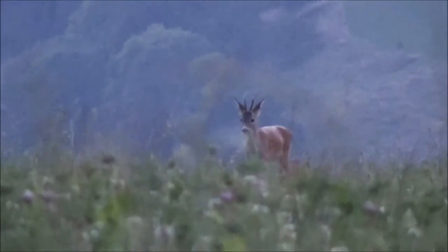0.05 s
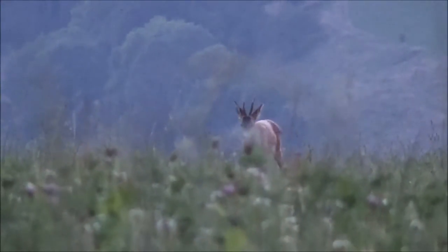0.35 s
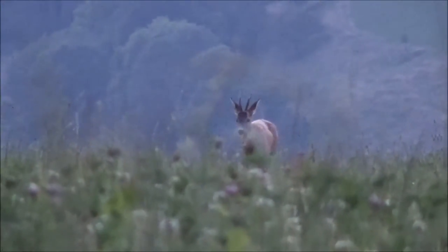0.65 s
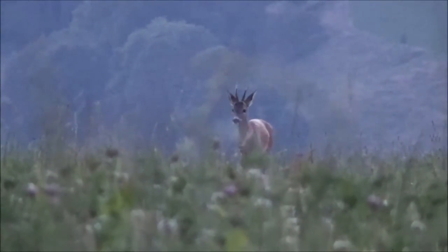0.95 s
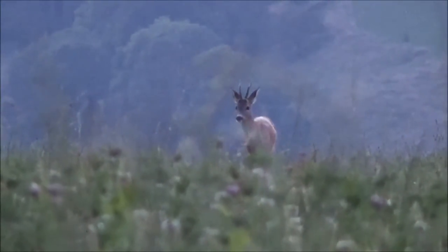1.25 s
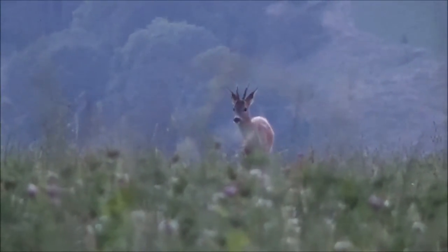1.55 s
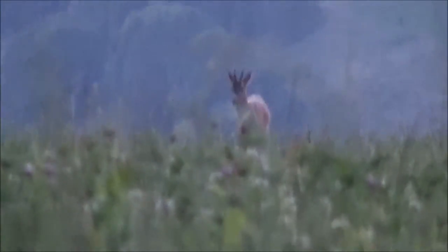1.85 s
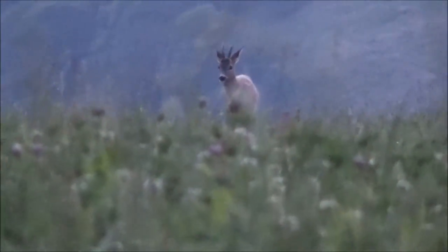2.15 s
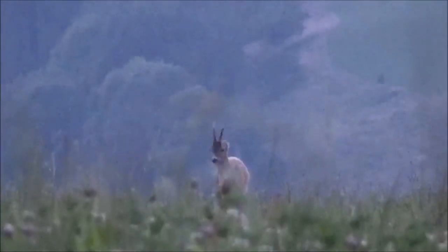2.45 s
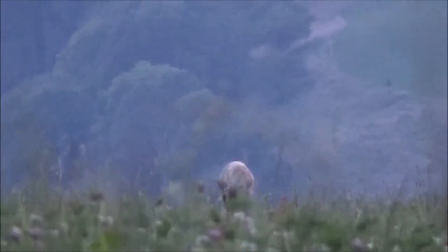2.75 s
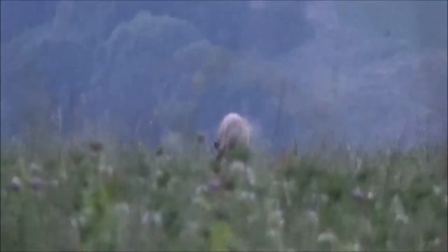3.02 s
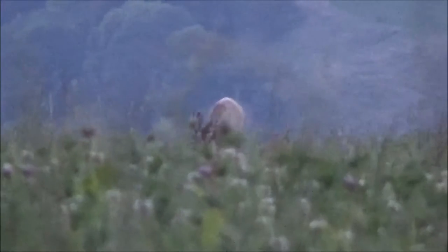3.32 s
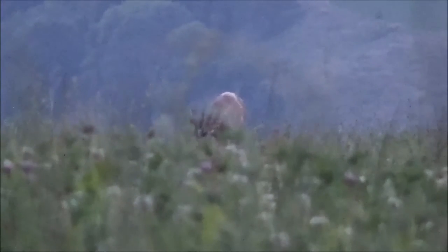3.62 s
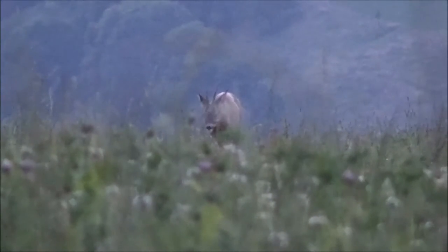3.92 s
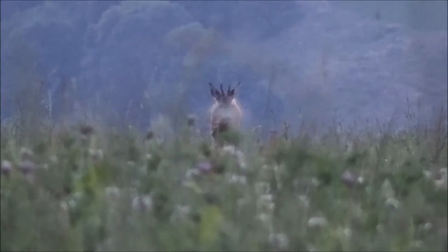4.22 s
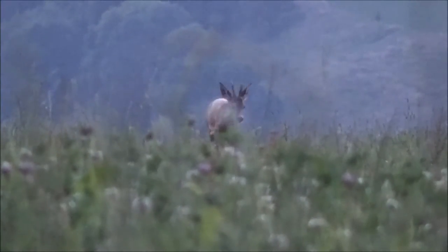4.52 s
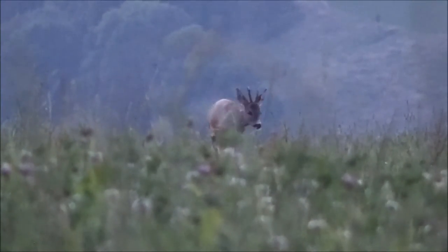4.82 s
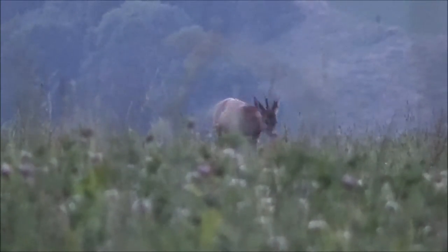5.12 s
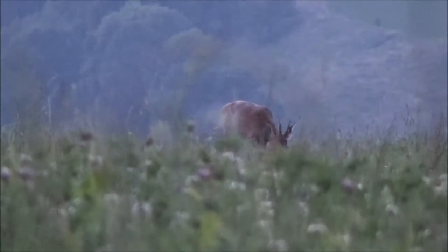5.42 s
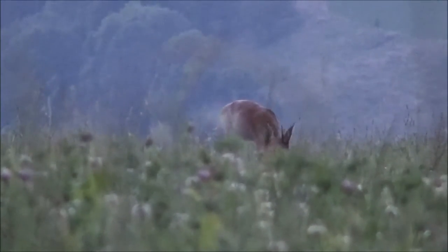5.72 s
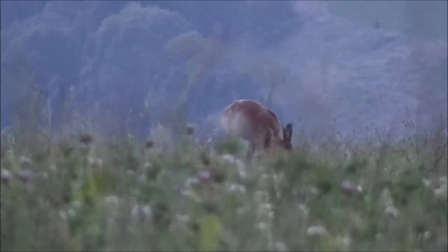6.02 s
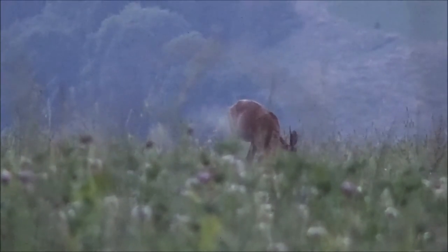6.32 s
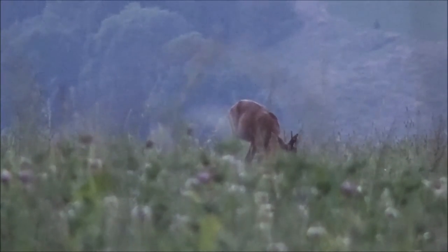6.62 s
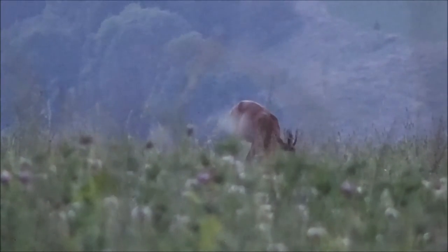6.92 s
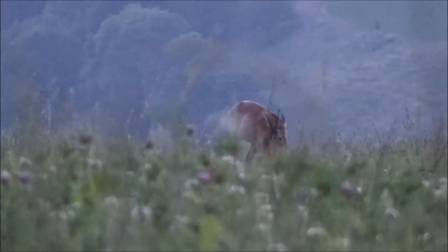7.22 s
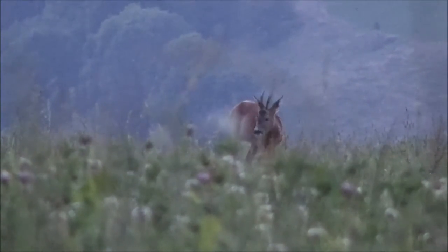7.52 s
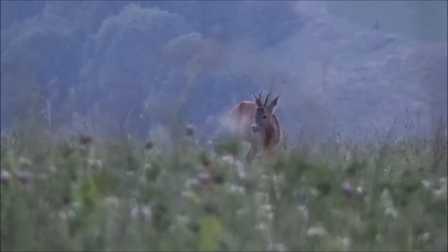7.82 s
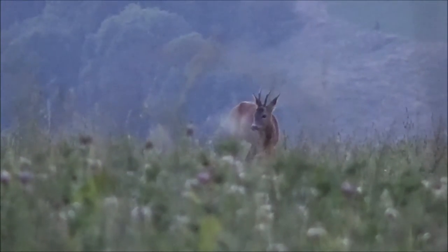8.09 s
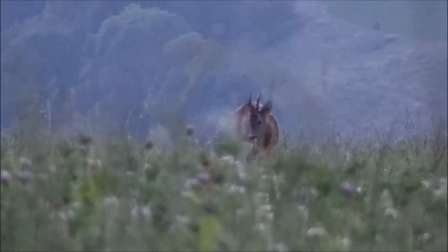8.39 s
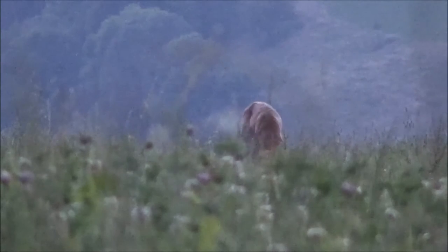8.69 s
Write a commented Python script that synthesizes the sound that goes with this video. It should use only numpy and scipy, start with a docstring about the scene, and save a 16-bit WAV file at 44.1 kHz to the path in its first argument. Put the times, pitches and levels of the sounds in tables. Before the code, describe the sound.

In an outdoor meadow, a wide bed of crickets keeps up a steady, high trill, with one nearer insect pulsing rapidly near the centre. Soft rustles and a small cluster of handling knocks on the microphone come early on. Two faint, echoing bird notes follow from far away, then mild low gusts of wind. A soft hush of air and a faint distant hum stay under the crickets throughout.

```python
"""Bush-crickets in an evening meadow.

One cricket trills close by without a break, and a chorus trills all around it.
Every wing stroke drags a row of file teeth over the scraper, and each tooth rings the wing.
Under them lie light wind, soft rustles and a far hum; a distant bird pipes twice,
and a few knocks ring the camera body."""
import sys
import numpy as np
from scipy import signal
from scipy.fft import rfft, irfft, next_fast_len
from scipy.io import wavfile

SR = 44100
rng = np.random.default_rng(int(sys.argv[2]) if len(sys.argv) > 2 else 0)


def put_to_file(sound):
    """Save the sound as 16-bit audio at rate SR, in the file named by the first command-line argument."""
    columns = np.atleast_2d(sound).T  # one column per channel
    safe = np.clip(columns, -1, 1)
    whole_steps = np.round(safe * 32767)
    wavfile.write(sys.argv[1], SR, whole_steps.astype(np.int16))


N = 394694


def undb(db):
    """Decibels to gain."""
    return 10 ** (np.asarray(db) / 20)


def unit(x):
    """Scale to rms 1."""
    return x / np.sqrt(np.mean(x ** 2))


def curve(rows):
    """An automation lane: (time, value) points joined by straight lines."""
    return np.interp(np.arange(N) / SR, *np.transpose(rows))


def colour(x, points):
    """EQ x with a (frequency, gain) curve drawn on a log frequency axis."""
    size = next_fast_len(N)
    hz = np.fft.rfftfreq(size, 1 / SR)
    point_hz, point_db = np.transpose(points)
    gain = undb(np.interp(np.log(hz + 1), np.log(np.sort(point_hz)), point_db))
    return irfft(rfft(x, size) * gain, size)[..., :N]


def fade(t, t60):
    """Exponential decay by 60 dB in t60 seconds."""
    return np.exp(-np.log(1000) * t / t60)


def swell(start, length):
    """One smooth rise and fall."""
    return np.sin(np.pi * np.clip((np.arange(N) / SR - start) / length, 0, 1))


def wander(count):
    """A random drift through count points."""
    return np.interp(np.arange(N), np.linspace(0, N, count), rng.standard_normal(count))


def pan(db):
    """Stereo gains that put left db above right."""
    return undb(np.array([[db], [-db]]) / 2)


def widen(mid, side):
    """Left and right from mid and side."""
    return np.array([mid + side, mid - side])


def scatter(x, t60, wet_db):
    """The direct sound and a diffuse tail that builds up from the surroundings."""
    t = np.arange(int(min(t60, 1) * SR)) / SR
    tail = rng.standard_normal(len(t)) * fade(t, t60) * (1 - fade(t, t60)) ** 2
    return x + undb(wet_db) * signal.oaconvolve(x, tail / np.linalg.norm(tail))[:N]


# Tone of the air bed, mid and side: (frequency [Hz], relative level [dB])
AIR_MID_EQ = [(12, -30), (22, 0), (60, -2), (90, -5), (140, -6.5), (200, -9.5), (280, -11), (780, -12.5),
              (1170, -13.5), (1740, -16), (3000, -19), (5200, -21), (7000, -41)]
AIR_SIDE_EQ = [(12, -32), (20, -9), (43, -16), (132, -9), (290, -4), (326, -4), (611, -2.5), (772, -4),
               (1070, -4.5), (3340, -11), (5200, -18), (6760, -50), (11400, -120)]
def still_air():
    """A wide, soft hush of shaped noise."""
    mid = unit(colour(rng.standard_normal(N), AIR_MID_EQ))
    side = unit(colour(rng.standard_normal(N), AIR_SIDE_EQ))
    return widen(undb(-38.7) * mid, undb(-40.5) * side)


# Low end of the wind: (frequency [Hz], relative level [dB])
WIND_EQ = [(12, -7), (25, -6.5), (50, 1), (75, -6.5), (110, -10), (200, -32), (500, -70)]
# Gust cues: (start [s], length [s], level [dB])
WIND_GUSTS = [(2.85, 1.25, -40), (3.42, 0.22, -38), (5.3, 0.15, -38), (5.9, 0.47, -34.5),
              (6.6, 0.21, -31.5), (6.75, 0.58, -36.5), (7.3, 2.1, -38.5)]
def wind(breeze_db=-46.5, eddy_db=1.5):
    """A light, rumbling breeze with gusts on top; eddies make it all flutter."""
    mid, side = unit(colour(rng.standard_normal((2, N)), WIND_EQ))
    gust_power = sum((undb(db) * swell(start, length)) ** 2 for start, length, db in WIND_GUSTS)
    strength = np.sqrt(undb(breeze_db) ** 2 + gust_power)
    flutter = undb(eddy_db * wander(count=80))
    return widen(mid, undb(-11.5) * side) * strength * flutter * pan(1.5)


# Tones of the hum: (pitch [Hz], waver [Hz], level [dB])
HUM_TONES = [(70.5, 1.95, -50.5), (110.2, 3.4, -52.5), (121.5, 3.12, -51), (169, 2.49, -53.5),
             (840, 3.1, -57)]
def far_hum():
    """A distant drone of sines, each wavering in pitch."""
    out = np.zeros(N)
    for hz, waver_hz, db in HUM_TONES:
        pitch = hz + waver_hz * wander(count=120)
        out += undb(db) * unit(np.sin(2 * np.pi * np.cumsum(pitch) / SR))
    return out


# Rustle cues: (start [s], length [s], centre [Hz], level [dB])
RUSTLE_CUES = [(0.014, 0.091, 500, -52), (1.76, 0.2, 1150, -43), (2.14, 0.21, 1050, -40.5),
               (3.244, 0.54, 940, -41.5), (3.25, 0.26, 115, -44)]
def rustles():
    """Soft, wide swells of noise, band-passed twice for steeper skirts."""
    out = np.zeros((2, N))
    for start, length, hz, db in RUSTLE_CUES:
        band = signal.iirpeak(hz, Q=1, fs=SR)
        noise = signal.lfilter(*band, rng.standard_normal((2, N)))
        out += undb(db) * swell(start, length) * unit(signal.lfilter(*band, noise))
    return out


# Bird notes: (start [s], length [s], pitch [Hz], dry level [dB])
BIRD_NOTES = [(4.71, 0.08, 1696, -39.5), (5.07, 0.17, 1720, -46.5)]
def bird():
    """Two thin notes of steady pitch that echo from the edge of the wood."""
    t = np.arange(N) / SR
    notes = sum(undb(db) * swell(start, length) * np.sin(2 * np.pi * hz * t)
                for start, length, hz, db in BIRD_NOTES)
    return np.array([scatter(notes, t60=2.2, wet_db=-0.5) for _ in range(2)])


# Modes of the camera body: (frequency [Hz], relative level [dB], 60 dB decay [s])
BODY_MODES = [(108.7, 4.5, 0.34), (215, 0, 0.1), (508, 1.5, 0.03), (577, -0.5, 0.11), (700, 2.5, 0.031),
              (1007, 0, 0.054), (1145, 9, 0.018), (1620, -1.5, 0.054), (2030, -1, 0.029), (3440, 8, 0.018),
              (4700, 9, 0.013)]
# Knock cues: (time [s], level [dB], centre [Hz], left minus right [dB])
KNOCK_CUES = [(0.059, -52, 520, 3), (2.283, -51, 320, -4), (3.258, -43.5, 400, -2), (3.393, -40, 1800, 0),
              (3.482, -35, 540, -3), (3.501, -46.5, 750, 2)]
def knocks():
    """Short blows ring the camera body, and each microphone shakes differently."""
    out = np.zeros((2, N))
    t = np.arange(SR // 3) / SR
    for start, db, hz, pan_db in KNOCK_CUES:
        phases = rng.normal(0, 1.0, (len(BODY_MODES), 2, 1))
        body = sum(undb(mode_db) * fade(t, t60) * np.sin(2 * np.pi * mode_hz * t + phase)
                   for (mode_hz, mode_db, t60), phase in zip(BODY_MODES, phases))
        # a brief crack, then the mount rattles on
        envelope = undb(3.0) * fade(t, 0.03) + undb(1.0) * fade(t, 0.21)
        crack = rng.standard_normal((2, len(t))) * envelope
        blow = signal.lfilter(*signal.iirpeak(hz, Q=.9, fs=SR), body + crack)
        blow = signal.lfilter(*signal.butter(2, min(3 * hz, SR / 3), fs=SR), blow)
        at = int(start * SR)
        out[:, at:at + len(t)] += unit(blow) * undb(db) * pan(pan_db)
    return out


def stridulate(stroke_hz, start, closing, uneven_db, slip, teeth=12):
    """Tooth strikes: each closing wing stroke plays a row of teeth, hardest in the middle."""
    cycles = start + np.cumsum(stroke_hz) / SR
    strokes = np.arange(int(40 * N / SR))[:, None]  # more than enough; spares are dropped
    jitter, force = rng.standard_normal((2, len(strokes), teeth))
    along_file = (np.arange(teeth) + .5) / teeth
    # closing is a share of the wing cycle; slip is timing spread in tooth spacings
    phase = strokes + closing * (along_file - .5 + slip * jitter / teeth)
    at = np.interp(phase, cycles, np.arange(N), left=-1, right=-1)
    strength = np.sqrt(np.sin(np.pi * along_file)) * undb(uneven_db * force)
    return np.bincount(at[at >= 0].astype(int), strength[at >= 0], N)


def grass(strikes, t60, wet_db):
    """Swaying stems throw every strike back as a short blur that is never the same twice."""
    feedback = fade(1 / SR, t60)
    energy = signal.lfilter([1 - feedback], [1, -feedback], strikes ** 2)
    return strikes + undb(wet_db) * np.sqrt(energy) * rng.standard_normal(N)


# Resonant peaks in the trill: (frequency [Hz], boost [dB])
TRILL_PEAKS = [(5825, 6), (6144, 6), (6233, 6), (6397, 5), (6583, 8), (6756, 6), (6849, 5), (6980, 6),
               (7118, 7), (7331, 7), (7445, 7), (7540, 6)]
def ring(x, width_hz):
    """Narrow resonances give the trill its silvery edge."""
    return x + sum((undb(db) - 1) * signal.lfilter(*signal.iirpeak(hz, hz / width_hz, SR), x)
                   for hz, db in TRILL_PEAKS)


def far_crickets(wing_eq, count):
    """Several singers, each drifting in pace and strength, blurred by grass and ground."""
    strikes = np.zeros(N)
    for _ in range(count):
        stroke_hz = rng.uniform(27, 37) + 1.6 * wander(count=20)
        strength = undb(0.76 * wander(count=30))
        strikes += strength * stridulate(stroke_hz, rng.random(), closing=1.08, uneven_db=2.55, slip=.4)
    blurred = scatter(grass(strikes, t60=0.06, wet_db=3.5), t60=0.053, wet_db=-9.5)
    return unit(colour(blurred, wing_eq))


# Wing tone of the chorus, mid and side: (frequency [Hz], relative level [dB])
CHORUS_MID_EQ = [(4500, -40.5), (5600, -20.5), (6400, -16), (7000, -4), (7400, -3.5), (7850, -3.5),
                 (8450, 0.5), (9200, -2.5), (10300, -5), (11200, -13.5), (12400, -27), (13700, -37),
                 (14600, -24.5), (16000, -32)]
CHORUS_SIDE_EQ = [(5000, -44), (6100, -30), (6500, -13), (7000, -3.5), (7800, -5), (8500, 0), (9300, -4),
                  (10400, -1), (11200, -7), (12000, -16), (13000, -31), (16000, -33)]
# Fader ride on the chorus: (time [s], relative level [dB])
CHORUS_RIDE = [(0, -26.6), (1.8, -27.5), (4.4, -28), (5.8, -27), (8.95, -27.5)]
def chorus():
    """A wide bed of crickets, five ahead and three from the sides."""
    mid = unit(ring(far_crickets(CHORUS_MID_EQ, count=5), width_hz=19.6))
    side = far_crickets(CHORUS_SIDE_EQ, count=3)
    return widen(undb(4.0) * mid, undb(-3.5) * side) * undb(curve(CHORUS_RIDE)) * pan(0.98)


# Wing tone of the near cricket: (frequency [Hz], relative level [dB])
NEAR_WING_EQ = [(4500, -42), (5600, -22.5), (6400, -9), (6950, 0), (7400, 0.5), (7850, -9), (8400, 3),
                (9100, -10), (10300, -6), (11500, -22), (13000, -43)]
# Fader ride on the near cricket: (time [s], level [dB])
NEAR_RIDE = [(0, -30.5), (.9, -27.5), (1.75, -31), (3.4, -29), (4.9, -34), (5.8, -29), (6.25, -31.5),
             (7, -28.5), (8.95, -30)]
def near_cricket(start_hz=32.842, sag_hz_per_s=.015):
    """The lead singer, near centre, slowing very slightly, its level shifting behind the grass."""
    stroke_hz = start_hz - sag_hz_per_s * np.arange(N) / SR
    strikes = stridulate(stroke_hz, start=.16, closing=.5, uneven_db=-0.7, slip=.25)
    wing = colour(grass(strikes, t60=0.025, wet_db=5), NEAR_WING_EQ)
    return unit(ring(wing, width_hz=24)) * undb(curve(NEAR_RIDE)) * pan(-1.3)


def scene():
    """The meadow mix: crickets over the ambience, with knocks and bird as spot effects."""
    crickets = near_cricket() + chorus()
    ambience = still_air() + wind() + far_hum() + rustles()
    return crickets + ambience + knocks() + bird()


def record(dry):
    """A steep low-pass at 15.9 kHz cuts the very top."""
    return signal.sosfilt(signal.ellip(10, .1, 80, 15900, fs=SR, output="sos"), dry)


dry = scene()
out = record(dry)
put_to_file(out)
```